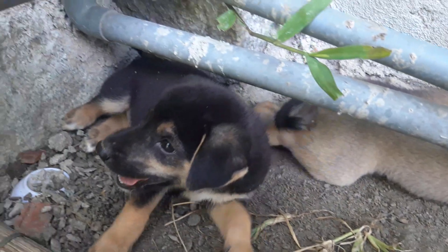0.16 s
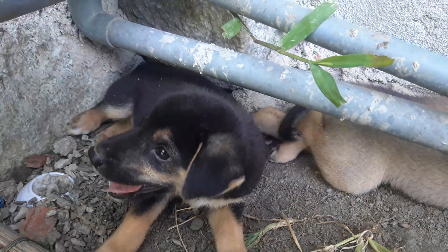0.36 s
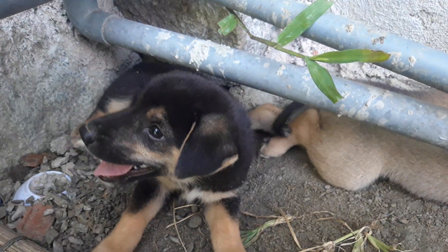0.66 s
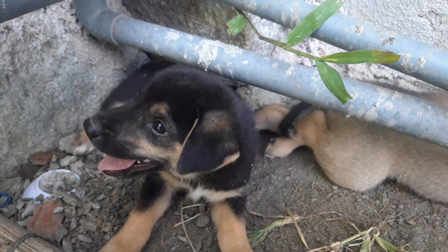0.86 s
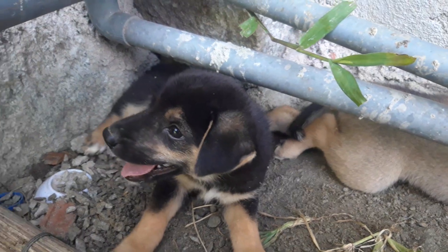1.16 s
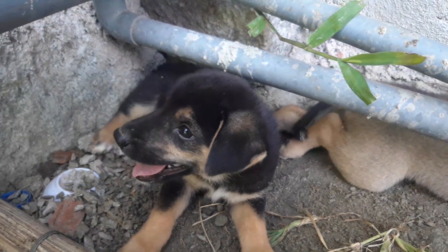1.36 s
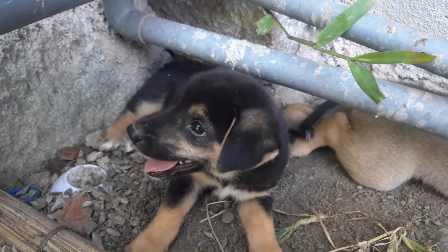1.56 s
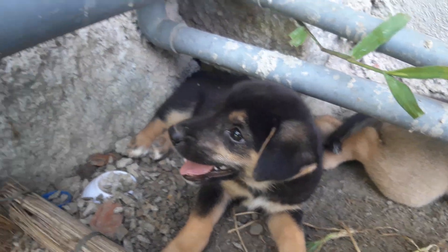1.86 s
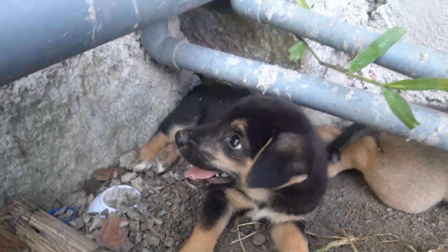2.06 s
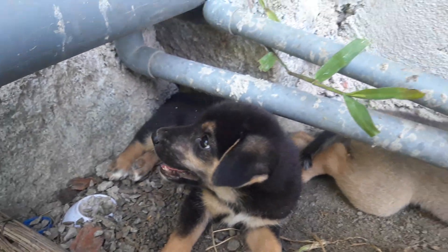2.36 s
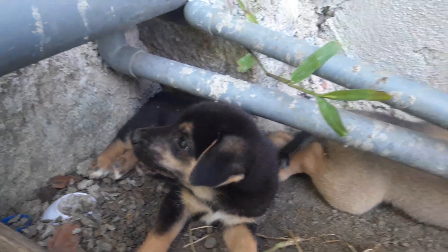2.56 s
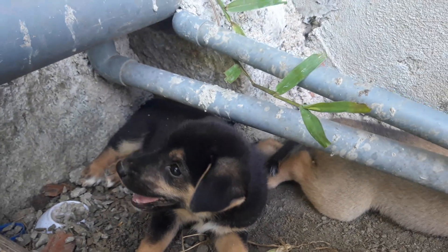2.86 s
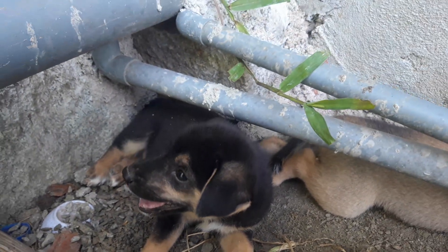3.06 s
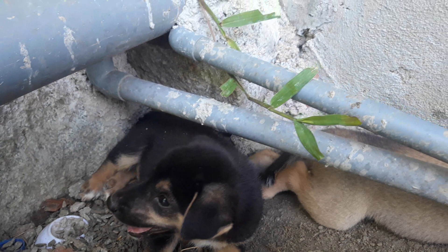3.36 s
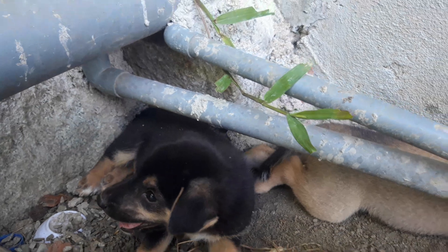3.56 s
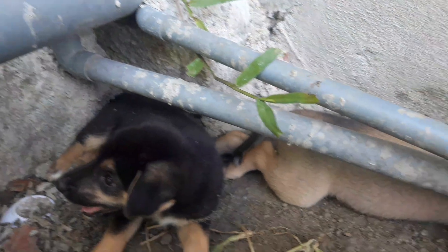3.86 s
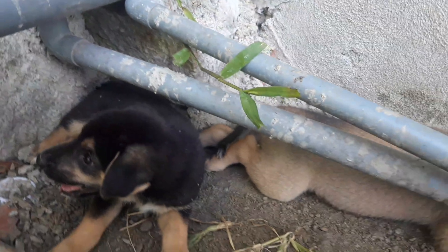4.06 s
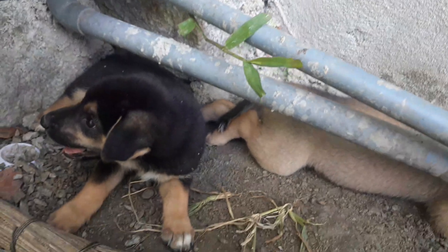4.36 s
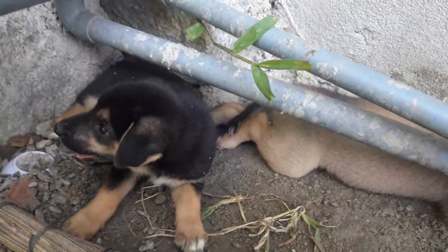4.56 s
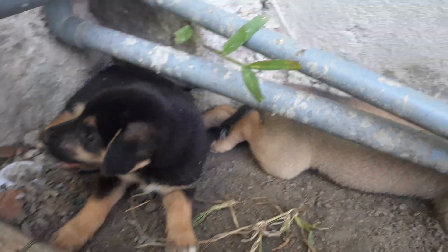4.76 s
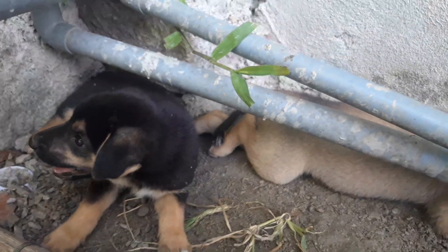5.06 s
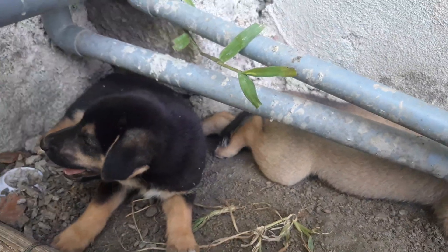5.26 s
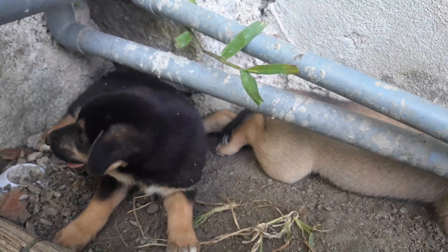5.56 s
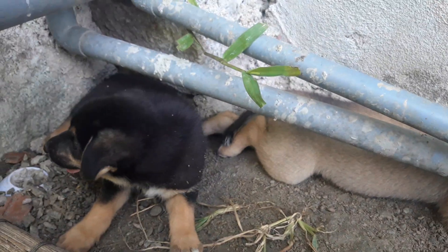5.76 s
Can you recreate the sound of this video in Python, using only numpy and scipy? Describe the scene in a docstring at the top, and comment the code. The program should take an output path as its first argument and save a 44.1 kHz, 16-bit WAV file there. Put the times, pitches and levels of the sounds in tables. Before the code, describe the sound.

Young chickens peep and trill some way off in a quiet yard while a puppy close by pants softly and rustles on dry dirt.

```python
"""Young chickens peep and chirp some way off in a quiet yard, each call a whistle that slides down.
One bird gives a long falling trill that echoes off a wall, and a hen repeats a soft, hoarse note.
Close by, a puppy pants in soft puffs of air and shifts on dry dirt, so grit and straw rustle and tick.
A faint, high insect throbs over a steady hiss; a low rumble lies under it all and swells near the end."""
import sys
import numpy as np
from scipy import signal
from scipy.fft import rfft, irfft
from scipy.io import wavfile
from scipy.ndimage import uniform_filter1d

SR = 44100
rng = np.random.default_rng(int(sys.argv[2]) if len(sys.argv) > 2 else 0)


def transcribe(u):
    """Save the signal u as a 16-bit wav file named by the first command-line argument.

    u: samples, shape (n,) or (channels, n), limited to [-1, 1]; the rate is SR.
    q: integer samples, one column per channel.
    """
    v = np.clip(np.atleast_2d(u).T, -1, 1)
    q = np.round(v * 32767).astype(np.int16)
    wavfile.write(sys.argv[1], SR, q)


N = 261513
TIME = np.arange(N) / SR


def gain_of(db):
    """Turns decibels into a number to multiply a sound by."""
    return 10 ** (np.asarray(db) / 20)


def evened(x):
    """Scales a signal so that its average size (rms) is 1."""
    return x / np.sqrt(np.mean(x ** 2) + 1e-20)


def look_up(table, hz):
    """Reads a table between its rows, spacing the frequencies by octaves."""
    f, value = np.transpose(table)
    return np.interp(np.log(hz + 1), np.log(f + 1), value)


def add(mix, start, sound):
    """Mixes a sound in at a start time in seconds."""
    at = round(start * SR)
    sound = sound[max(-at, 0):]
    part = mix[max(at, 0):][:len(sound)]
    part += sound[:len(part)]


def noise():
    """Plain hiss, equally strong at all frequencies."""
    return rng.standard_normal(N)


def coloured(x, tone):
    """Shapes a sound's lows and highs by a tone table; the result has rms 1."""
    hz = np.fft.rfftfreq(len(x), 1 / SR)
    return evened(irfft(rfft(x) * gain_of(look_up(tone, hz)), len(x)))


def drift(rate_hz):
    """A smooth random wobble, mostly slower than rate_hz."""
    hz = np.fft.rfftfreq(N, 1 / SR)
    return evened(irfft(rfft(noise()) / (1 + (hz / rate_hz) ** 4), N))


def resonate(x, hz, width_hz):
    """Keeps the part of a sound near one pitch."""
    return signal.lfilter(*signal.iirpeak(min(hz, SR / 2 - 1), hz / width_hz, SR), x)


def envelope(start, length, rise_s, fade_s):
    """A loudness curve that rises from the start and dies away once its length is over."""
    rise = np.clip((TIME - start) / rise_s, 0, 1)
    return rise * np.exp(-np.maximum(TIME - start - length, 0) / fade_s)


# Tone of the outdoor hiss: f/Hz, level/dB
AIR_TONE = [(30, -3.5), (200, -22), (450, -8), (1000, -9), (1700, -15.5), (2100, -15), (3000, -0.5),
            (5300, 3), (6400, -6), (8300, 5.5), (9300, -1), (10200, -13), (12000, -4.5), (16000, -33)]
def air():
    """An outdoor hiss that barely wavers."""
    return gain_of(-59.5) * coloured(noise(), AIR_TONE) * gain_of(.5 * drift(1.5))


# Tone of the hiss that differs between left and right: f/Hz, level/dB
SIDE_TONE = [(30, 12), (80, 1), (450, 5), (1100, -0.5), (1800, -16), (6000, -5), (9000, -16), (11000, 4),
             (15500, 3.5)]
def side_hiss():
    """A very faint hiss, opposite in the left and right channels."""
    return gain_of(-82.5) * coloured(noise(), SIDE_TONE)


# Tone of the rumble: f/Hz, level/dB
RUMBLE_TONE = [(20, -33), (35, -34), (55, -3.5), (95, -1.5), (130, -1), (165, -4.5), (200, -24),
               (300, -17.5), (420, -40), (900, -38), (3000, -88)]
def rumble():
    """A low rumble with a faint hum in it, steady but for one soft surge."""
    hum = np.sin(2 * np.pi * np.cumsum(127 + 5 * drift(9.3)) / SR)
    surge_db = 6.5 * np.exp(-((TIME - 1.73) / .41) ** 2)
    return evened(coloured(noise(), RUMBLE_TONE) + .5 * hum) * gain_of(-66.5 + surge_db)


# Tone of the swell: f/Hz, level/dB
SWELL_TONE = [(40, -50), (72, -23), (92, 3), (130, 12), (200, -6.5), (280, -10.5), (318, -2.5),
              (370, -16.5), (600, -24.5), (2000, -72)]
def swell():
    """A brighter rumble that grows near the end."""
    loudness = gain_of(-75) + gain_of(-53) * envelope(4.38, .83, rise_s=.5, fade_s=.47)
    return coloured(noise(), SWELL_TONE) * loudness


# Time the yard's echo takes to fade by 60 dB: f/Hz, t/s
ECHO_FADE = [(500, 0.47), (3000, 0.46), (5000, 0.52), (10000, 0.44)]
def yard_echo(x):
    """Sound bounces off walls and ground as many tiny, fading echoes."""
    t = np.arange(SR) / SR
    bounces = rng.standard_normal(SR) * (rng.random(SR) < 2500 / SR) * (t > .004)
    bounces *= 1 + .28 * np.exp(-t / .048)  # early ones are stronger
    hz, age, bands = signal.stft(bounces, SR, nperseg=256)
    fade = gain_of(-60 * age / look_up(ECHO_FADE, hz)[:, None])
    tail = signal.istft(bands * fade, SR, nperseg=256)[1]
    return signal.fftconvolve(x, tail / np.linalg.norm(tail))[:N]


# Spells of insect sound: start t/s, length t/s, level/dB
INSECT_SPELLS = [(-.2, 2.6, -64.5), (5.303, .9, -61)]
def insect():
    """A thin, high rasp that throbs about nine times a second."""
    wing = resonate(resonate(noise(), 9480, 630), 9480, 630)
    throb = 1 + .5 * np.cos(2 * np.pi * np.cumsum(9.3 + .87 * drift(.78)) / SR)
    spells = sum(gain_of(db) * envelope(start, length, rise_s=1, fade_s=.17)
                 for start, length, db in INSECT_SPELLS)
    return evened(wing * throb) * spells


# Bouts of panting: first puff t/s, last puff t/s, number of puffs, loudest t/s, level/dB
PANTS = [(0.152, 1.269, 8, 0.54, -58), (3.025, 3.686, 5, 3.45, -69.5), (4.96, 5.665, 5, 5.4, -66)]
def panting():
    """Soft puffs of air through the puppy's open mouth, about six a second."""
    fade_db_per_s = 23.5
    puffs = np.zeros(N)
    for first, last, count, loudest, db in PANTS:
        for at in np.linspace(first, last, count):
            puff = np.exp(-((TIME - at) / .021) ** 2)
            puffs += gain_of(db - fade_db_per_s * abs(at - loudest)) * puff
    mouth = resonate(resonate(noise(), 803, 240), 757, 280)
    hiss = resonate(resonate(noise(), 4200, 2200), 4200, 2200)
    return puffs * (evened(mouth) + gain_of(.5) * evened(hiss))


# Bright tone colour shared by the ticks and crackle: f/Hz, level/dB
BRIGHT_TONE = [(200, -29), (700, -5), (1500, -14.5), (2500, -4.5), (3600, -2.5), (4600, -0.5), (5400, 3.5),
               (6500, -4.5), (8400, 4.5), (10200, -16), (12000, -2), (16000, -19.5)]
# The loudest ticks of grit and straw: t/s, peak level/dB, f/Hz
LOUD_TICKS = [(.1153, -32, 2200), (.1235, -32, 2250), (.1307, -27, 6470), (.2349, -34.5, 4630),
              (.3936, -35.5, 3280), (.563, -39.5, 2295), (.568, -38, 2270), (.5735, -33, 3000),
              (.6395, -29, 7100), (1.241, -31, 5030), (1.5864, -26, 8500), (1.7129, -21.5, 7850),
              (1.7159, -22, 7150), (1.724, -24, 6590), (1.738, -18, 8050), (1.7771, -30.5, 2140),
              (1.779, -22.5, 8500), (1.8087, -23.5, 7400), (1.8941, -26, 6030), (2.0279, -27.5, 4150),
              (2.1139, -32.5, 4960), (2.215, -36, 5630), (2.3115, -28, 5750), (2.3155, -25.5, 5700),
              (2.502, -34.5, 4560), (3.519, -29.5, 4160), (4.0437, -35, 1660), (4.1086, -34.5, 1770),
              (4.109, -30.5, 4800), (4.1358, -30, 5800), (4.274, -31, 4550), (4.3479, -31.5, 4570),
              (4.4025, -33, 4350), (4.6699, -34, 5630), (4.7002, -35.5, 8500), (5.368, -36.5, 2420)]
def ticks(rows):
    """Each grain snaps and rings briefly at its own pitch; bigger, lower grains ring longer."""
    out, t = np.zeros(N), np.arange(2048) / SR
    hz = abs(np.fft.fftfreq(len(t), 1 / SR))
    log_gain = np.log(gain_of(look_up(BRIGHT_TONE, hz)))
    # the bright tone colour, as a filter that rings only after the snap
    colour = np.exp(np.conj(signal.hilbert(log_gain)))[:len(t) // 2 + 1]
    for start, db, pitch_hz in rows:
        smallness = pitch_hz / 5000
        ring_s = .015 / smallness ** .64
        snap = rng.choice([-1, 1], len(t)) * (gain_of(-60 * t / ring_s) + 1.13 * np.exp(-t / .00028))
        ring = resonate(irfft(rfft(snap) * colour), pitch_hz, pitch_hz * .55 * min(smallness, 1))
        band_hz = [min(.55 * pitch_hz, 3600), min(2.8 * pitch_hz, SR / 2 - 1000)]
        ring = signal.sosfilt(signal.butter(2, band_hz, "band", fs=SR, output="sos"), ring)
        add(out, start, gain_of(db) * ring / abs(ring).max())
    return out


def crumbs(rub):
    """Harder rubbing shakes loose more and louder little ticks."""
    most_per_s, middle_hz = 66, 6550
    at = np.flatnonzero(rng.random(N) < most_per_s / SR * rub / rub.max())
    size, pitch = rng.standard_normal((len(at), 2)).clip(-2, 2).T
    db = 20 * np.log10(rub[at]) + 21 + 3 * size
    return ticks(zip(at / SR, db, middle_hz * np.exp(.22 * pitch)))


# Tone of fur rubbing on dirt: f/Hz, level/dB
FUR_TONE = [(200, -11.5), (700, -19), (1500, -14), (2500, -4), (3600, 2.5), (4600, 4), (5400, 2),
            (6500, -1), (8400, 0.5), (10200, -17), (12000, -8), (16000, -10.5)]
# Tone of scraped soil: f/Hz, level/dB
SOIL_TONE = [(200, -17.5), (700, -20.5), (950, -4.5), (1400, -13), (2050, 0), (3200, 5), (6000, -27.5),
             (16000, -61)]
def rustle(rub, scrape):
    """Fur and paws drag on dirt: grains hiss, crackle when pressed hard, and soil gives way dully."""
    grains = (rng.random(N) < 450 / SR) * gain_of(2.9 * np.minimum(rng.exponential(1, N), 3.5))
    grains *= rng.choice([-1, 1], N)
    click = rng.standard_normal(130) * np.exp(-np.arange(130) / 30)
    grains = evened(signal.oaconvolve(grains, click)[:N])
    fur = gain_of(10) * coloured(noise() + .45 * grains, FUR_TONE) * rub
    highs_only = signal.butter(4, 5300, "high", fs=SR, output="sos")
    bright = evened(signal.sosfilt(highs_only, coloured(grains, BRIGHT_TONE)))
    crackle = gain_of(4) * bright * rub * (rub / rub.max()) ** 1.1
    soil = coloured(noise() + 2 * grains, SOIL_TONE) * scrape
    flicker = gain_of(2.3 * drift(52))
    return (fur + crackle + soil) * flicker


# The puppy's shifts: start t/s, length t/s, rise t/s, relative rub level/dB, scrape level/dB
MOVES = [(-.03, 0.11, 0.023, -62.5, -73), (0.197, 0.59, 0.019, -67, -77), (1.552, .31, 0.085, -59.5, -72.5),
         (2.243, 0.21, 0.033, -77.5, -94), (2.8, .2, .1, -73, -90), (3.58, 0.37, 0.37, -65, -73),
         (3.989, 0.16, 0.019, -61.5, -56), (4.26, 0.18, 0.059, -65, -68), (4.55, 0.19, 0.058, -67.5, -79.5)]
def puppy():
    """The puppy pants and shifts about; each shift rubs and scrapes the dirt."""
    rub, scrape = gain_of(-77), gain_of(-84)  # at rest
    for start, length, rise_s, rub_db, scrape_db in MOVES:
        push = envelope(start, length, rise_s, fade_s=.12)
        rub = np.hypot(rub, gain_of(rub_db) * push)
        scrape = np.hypot(scrape, gain_of(scrape_db) * push)
    return ticks(LOUD_TICKS) + rustle(rub, scrape) + panting() + crumbs(rub)


def whistle(hz, octave_db, rasp, swell_db=0):
    """A bird's tone plus the octave above; shaking the pitch by the share `rasp` makes it hoarse."""
    progress = np.linspace(0, 1, len(hz))
    shake = evened(uniform_filter1d(rng.standard_normal(len(hz)), size=50))
    phase = 2 * np.pi * np.cumsum(hz * (1 + rasp * shake)) / SR
    tone = np.sin(phase) + gain_of(octave_db) * np.sin(2 * phase)
    arch = np.sin(np.pi * progress).clip(0) ** .58
    return evened(tone * arch * gain_of(swell_db * progress))


def note(length, start_hz, end_hz, octave_db, rasp):
    """A whistle that slides evenly from one pitch to another."""
    return whistle(np.geomspace(start_hz, end_hz, int(length * SR)), octave_db, rasp)


def hen():
    """A hen further off repeats a soft, hoarse, nearly level note at an even pace."""
    out = np.zeros(N)
    for start in 2.5 + .23 * np.arange(6):
        hz = 1213 * (1 + .019 * rng.standard_normal())
        add(out, start, gain_of(-72) * note(.049, hz, hz * .97, octave_db=1, rasp=.07))
    return out


def trill():
    """A run of notes that sink and fade; the nearest wall's echo fills part of each gap."""
    start_s, step_s, wall_delay_s, sink_hz_per_s = 2.254, .092, .027, 247
    out = np.zeros(N)
    beats = step_s * np.arange(13)
    for t in beats:
        fresh = np.exp(-t / .2)  # the first notes are slower, higher and slide further
        at = start_s + t + .022 * (1 - fresh)
        hz = (2946 + 196 * fresh - sink_hz_per_s * t) * (1 + .0054 * rng.standard_normal())
        slide = 1.028 + .084 * fresh
        db = -54 - 9.5 * (t / beats[-1]) ** 2.24
        sound = gain_of(db) * note(.0401, hz * slide, hz / slide, octave_db=-22, rasp=.015)
        add(out, at, sound)
        add(out, at + wall_delay_s, gain_of(-11.5) * sound)
    return out


# Short chirps: start t/s, length t/s, start f/Hz, end f/Hz, level/dB before mixing, octave level/dB
CHIRPS = [(1.45, 0.098, 3560, 3433, -61.5, -21), (1.918, 0.024, 4270, 3530, -47, -10),
          (1.455, .05, 2330, 2240, -68, -10), (4.869, .039, 4100, 3500, -56.5, -13),
          (4.995, .036, 4430, 3520, -46.5, -7.5), (5.257, 0.073, 3090, 2630, -66, -20),
          (5.363, 0.026, 4460, 3630, -50, -11), (5.479, .052, 4415, 3506, -44.5, -7.5),
          (5.638, 0.068, 4525, 3764, -39.5, -15), (5.667, .048, 3400, 2134, -51.5, 4),
          (5.744, 0.034, 3260, 3056, -52.5, -6)]
def chirps():
    """Young chickens' short downward slides: the wider the fall, the raspier."""
    out = np.zeros(N)
    for start, length, start_hz, end_hz, db, octave_db in CHIRPS:
        rasp = .0099 + .064 * np.log2(start_hz / end_hz)
        add(out, start, gain_of(db) * note(length, start_hz, end_hz, octave_db, rasp))
    return out


# Long falling peeps: start t/s, length t/s, top f/Hz, end f/Hz, level/dB before mixing
PEEPS = [(-.08, 0.12, 5800, 2742, -47), (0.264, 0.12, 5610, 2764, -51), (0.65, .127, 5854, 2660, -44),
         (1.209, 0.1, 5400, 2910, -63), (3.171, .12, 5310, 2947, -56.5), (3.584, 0.11, 5450, 2940, -50.5),
         (5.564, 0.092, 5270, 3100, -51)]
def peeps():
    """Young chickens hold a thin top note, then tumble into a rasp that rings louder in the throat."""
    hold = .24  # share of the call spent on the top pitch
    out = np.zeros(N)
    for start, length, top_hz, end_hz, db in PEEPS:
        progress = np.linspace(0, 1, int(length * SR))
        fall = np.sin(np.pi / 2 * np.maximum(progress - hold, 0) / (1 - hold)) ** 2
        hz = top_hz * (end_hz / top_hz) ** fall
        voice = whistle(hz, octave_db=-23, rasp=.02 + .095 * np.sqrt(fall), swell_db=3)
        throat = resonate(voice, hz=3325, width_hz=750)
        add(out, start, gain_of(db) * evened(throat + gain_of(-9) * voice))
    return out


def scene():
    """The far birds arrive mostly as echo, the near puppy mostly direct. Both ears hear much the same."""
    chickens = peeps() + chirps() + hen()
    song, near = trill(), puppy()
    direct = gain_of(-4) * chickens + song + near + insect()
    echo = yard_echo(gain_of(-2) * chickens + gain_of(3.5) * song + gain_of(-10.5) * near)
    middle = direct + echo + air() + rumble() + swell()
    side = side_hiss()
    return np.array([middle + side, middle - side])


def record(dry):
    """Cuts off the very highest treble."""
    treble_cut = signal.firwin(511, 16050, window=("kaiser", 9), fs=SR)
    return signal.oaconvolve(dry, treble_cut[None], "same")


dry = scene()
out = record(dry)
transcribe(out)
```